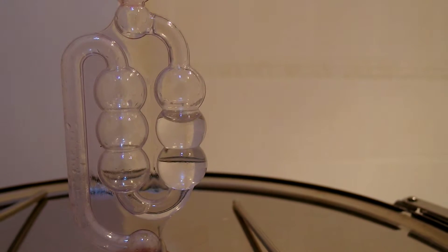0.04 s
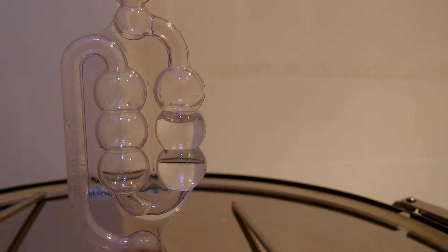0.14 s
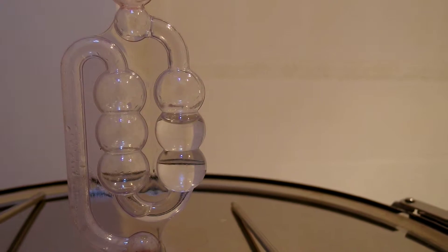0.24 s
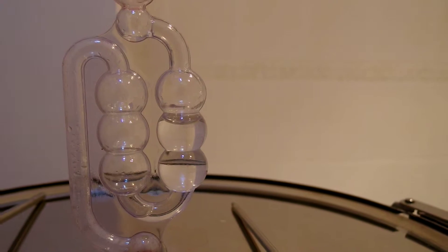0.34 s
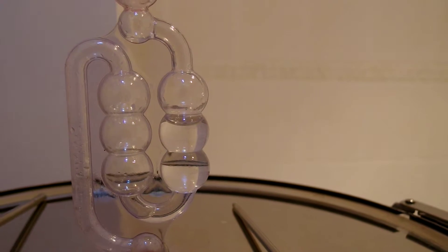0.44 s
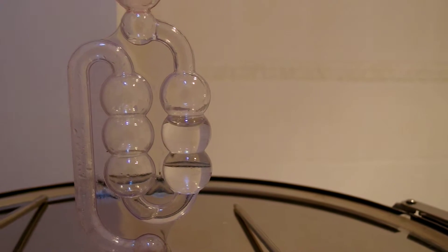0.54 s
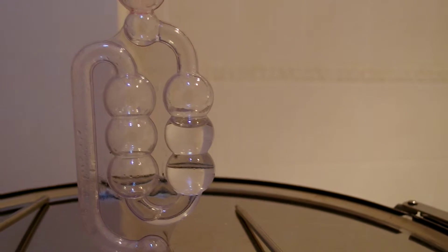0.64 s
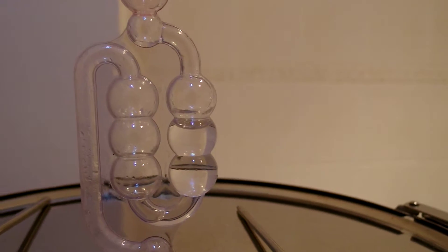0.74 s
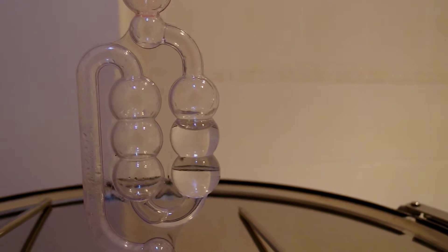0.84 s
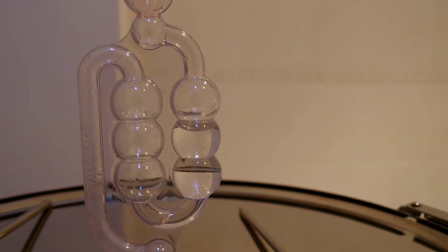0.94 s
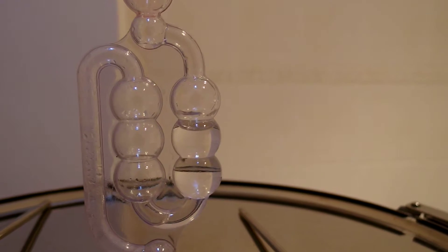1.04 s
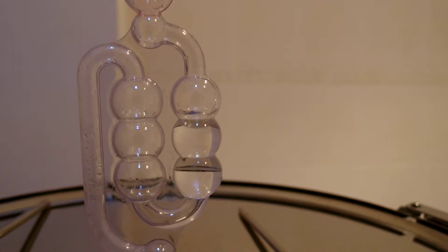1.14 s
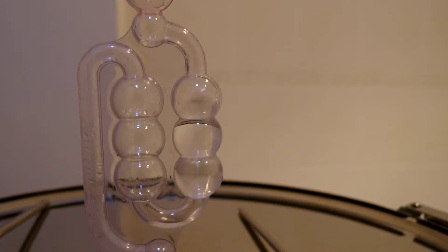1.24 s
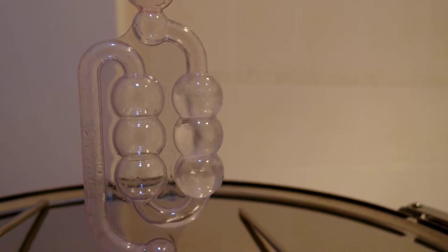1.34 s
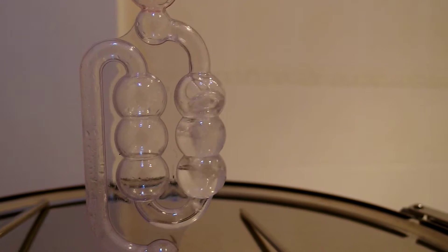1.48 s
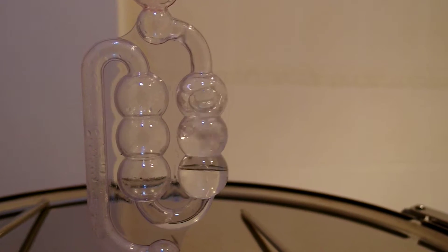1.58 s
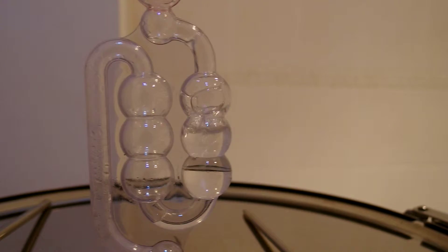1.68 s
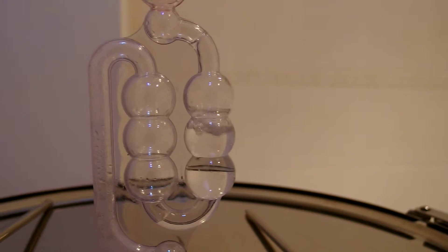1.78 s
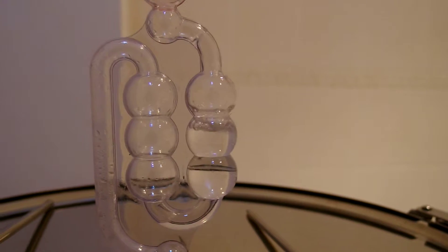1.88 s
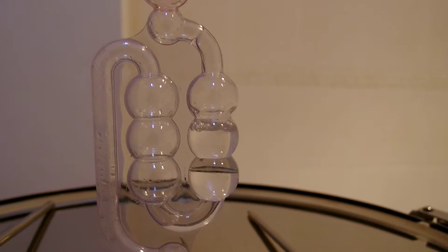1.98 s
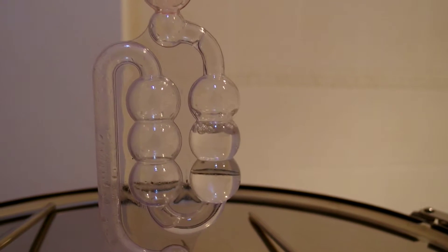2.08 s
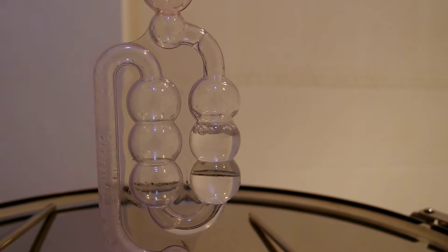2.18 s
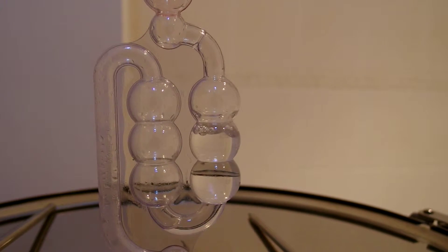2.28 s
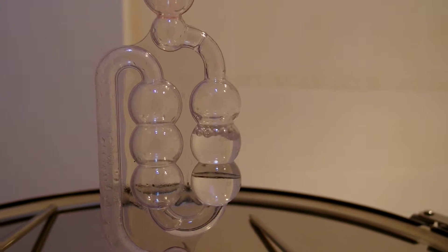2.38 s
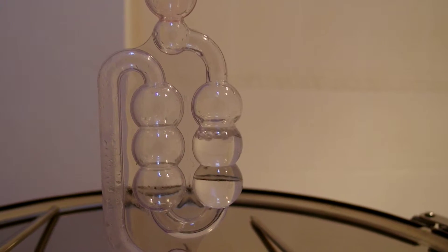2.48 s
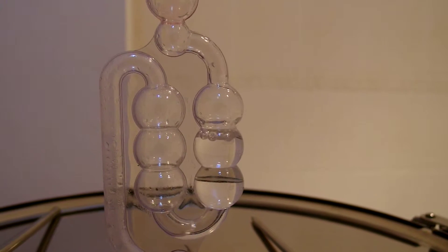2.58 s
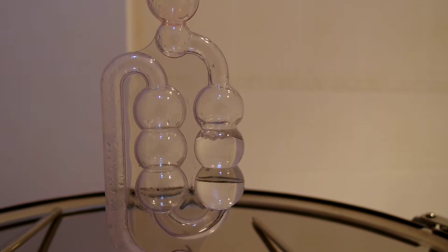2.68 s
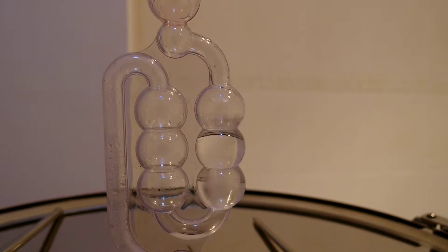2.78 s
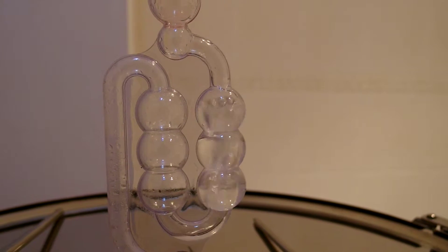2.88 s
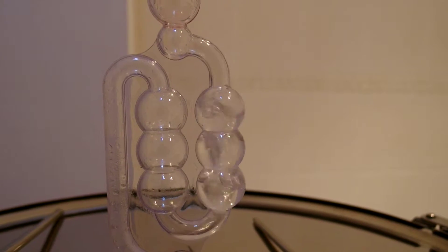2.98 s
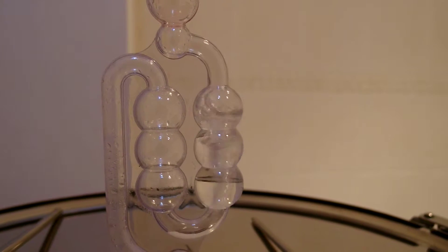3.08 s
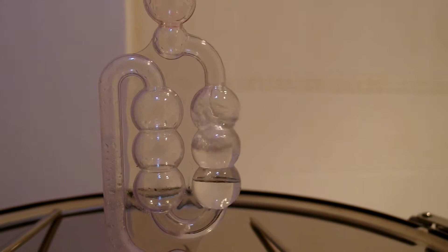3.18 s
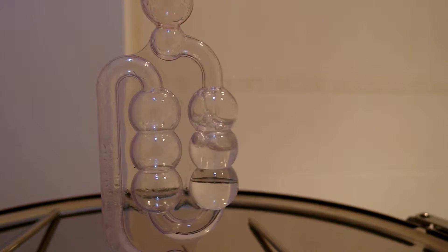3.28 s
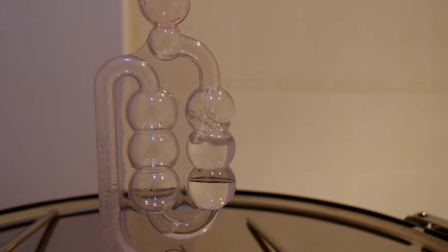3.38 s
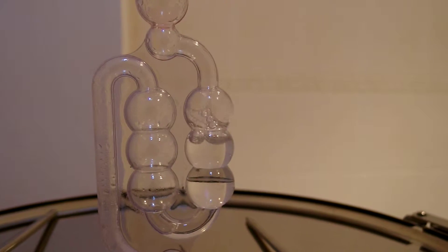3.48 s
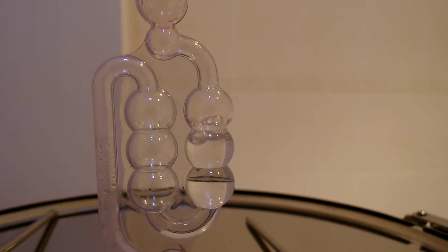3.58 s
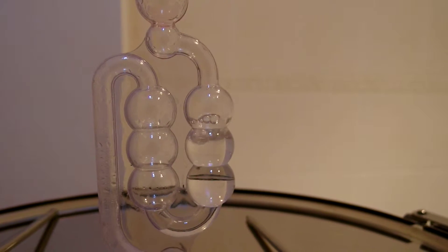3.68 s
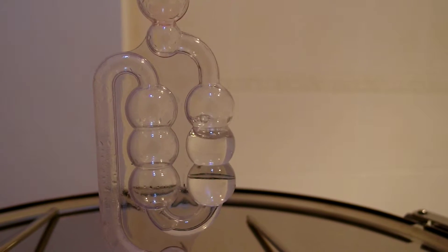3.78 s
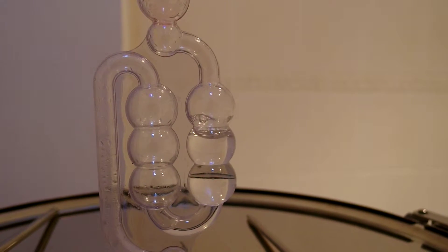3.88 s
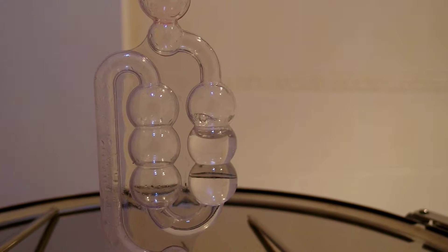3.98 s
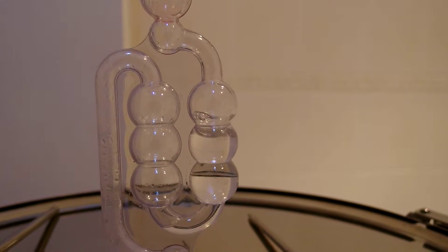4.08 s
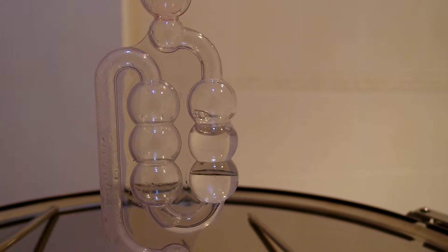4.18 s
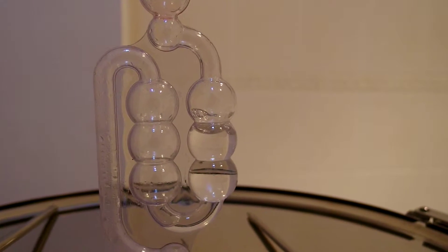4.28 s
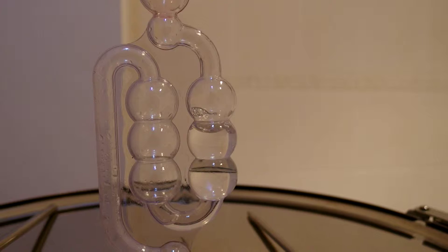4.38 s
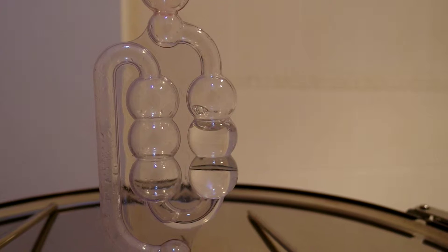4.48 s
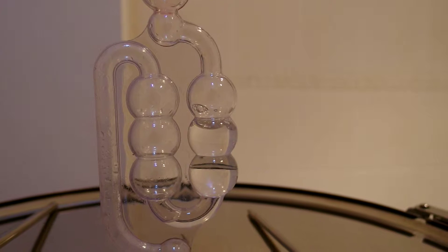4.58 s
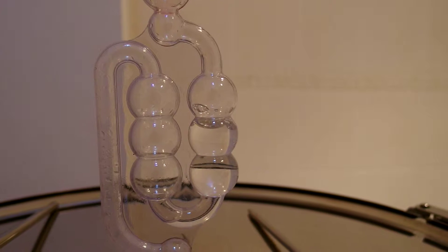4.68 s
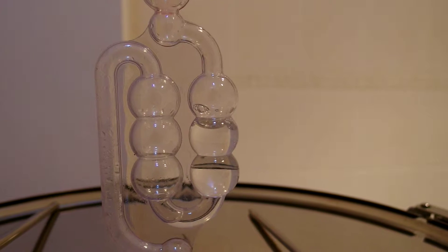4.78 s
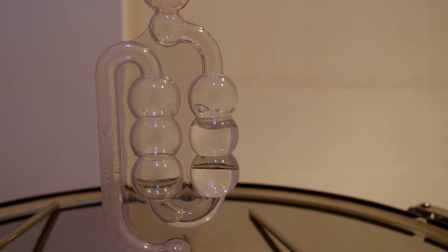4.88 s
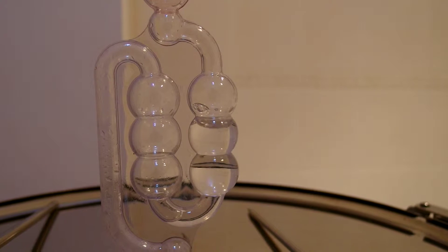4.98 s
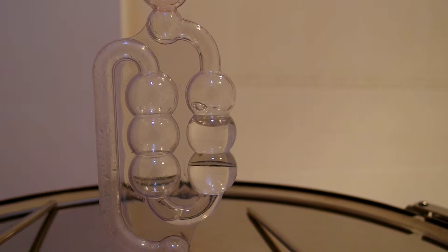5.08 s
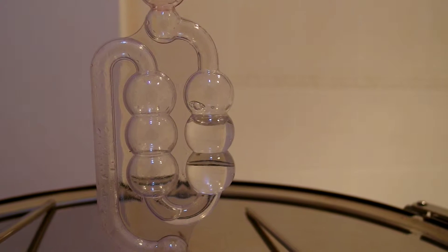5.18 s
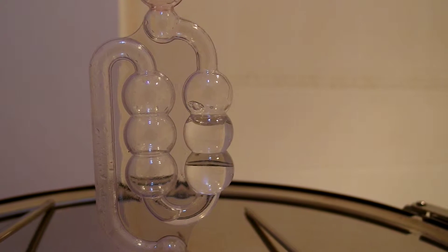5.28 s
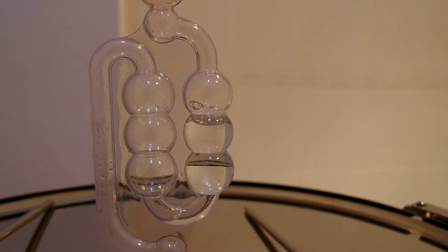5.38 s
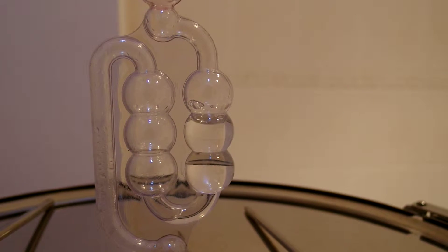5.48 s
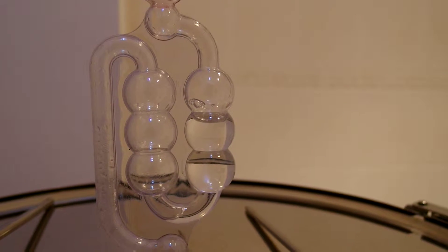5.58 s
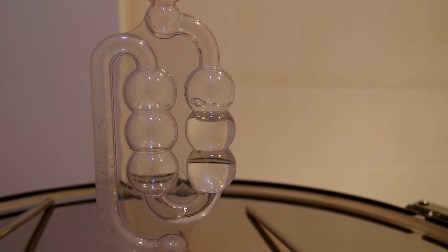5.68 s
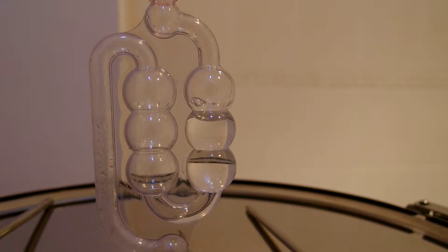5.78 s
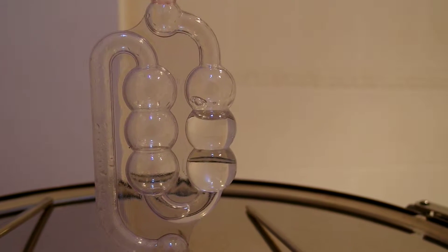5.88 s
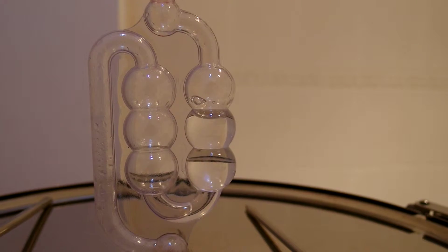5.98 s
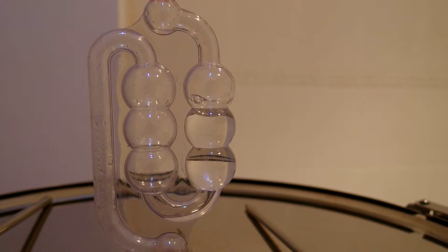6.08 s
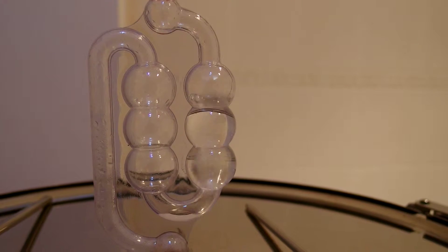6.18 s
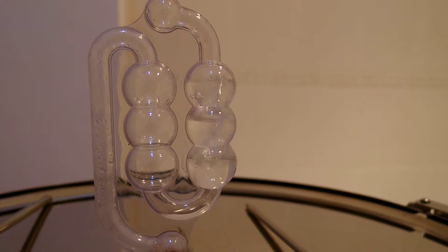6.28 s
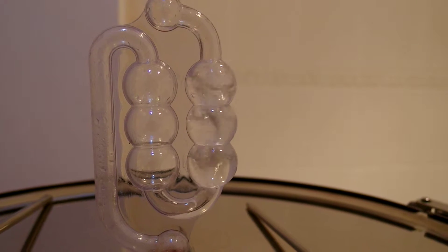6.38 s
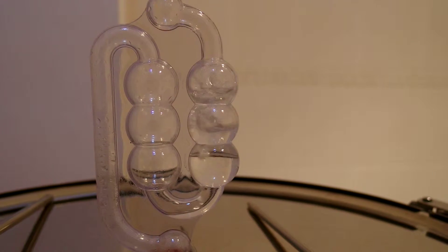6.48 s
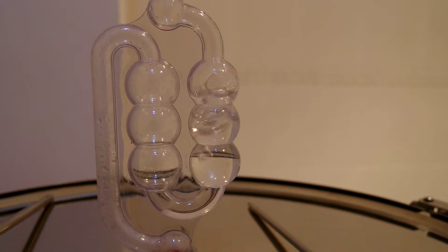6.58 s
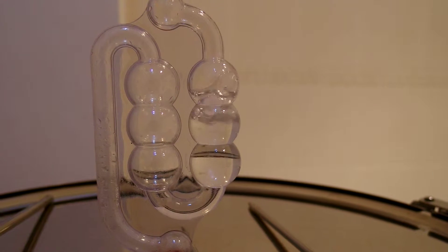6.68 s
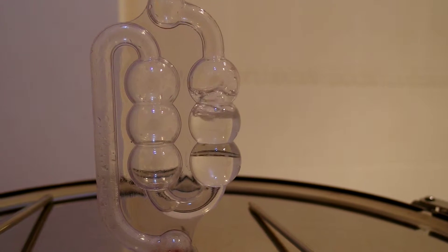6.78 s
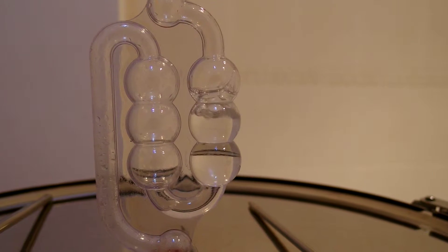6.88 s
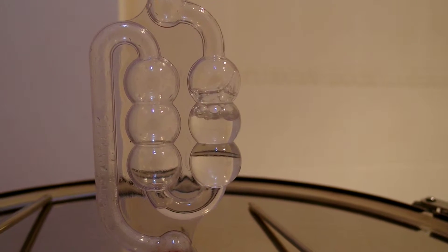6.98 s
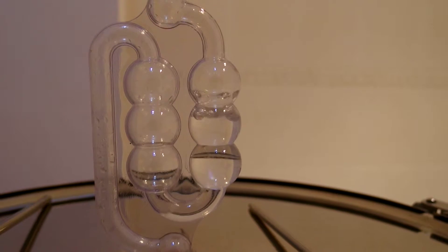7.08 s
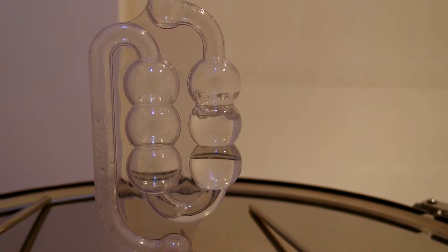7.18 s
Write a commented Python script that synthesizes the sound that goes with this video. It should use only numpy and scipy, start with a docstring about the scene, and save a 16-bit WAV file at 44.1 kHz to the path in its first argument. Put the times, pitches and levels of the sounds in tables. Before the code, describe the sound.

Soft steady hiss, then gas pushes through water in three brief bursts, each about a third of a second: rounded low glugs, fine churning, bright pops and tiny droplets. The drum underneath rings briefly and the small indoor space adds a short echo. The second burst has the sharpest snap; a long quiet gap precedes the last. Heard close, slightly left.

```python
"""Gurgling airlock

Gas leaves a fermenting drum through a water-filled plastic airlock in three gurgles, close to the microphone.
Large gas pockets glug and the drum thuds on a low note: short decaying tones. Churn and spray are crowds of
tiny ones. Bursting bubbles chirp and snap; ringing filters make the drum and fading noise makes the room's
echo. Steady noise hisses throughout over a faint deep wavering; a few very faint glugs fall outside the
gurgles."""
import sys
import numpy as np
from scipy import signal
from scipy.fft import rfft, irfft, next_fast_len
from scipy.io import wavfile

SR = 44100
rng = np.random.default_rng(int(sys.argv[2]) if len(sys.argv) > 2 else 0)


def unload_wav(signal):
    """Save mono or channel-first audio to the path in sys.argv[1] as 16-bit WAV at rate SR, clipped to [-1, 1]."""
    wavfile.write(
        sys.argv[1],
        SR,
        np.round(np.clip(np.atleast_2d(signal).T, -1, 1) * 32767).astype(np.int16),
    )


N = 319372   # length in samples, about 7.2 s
LOCK_PAN_DB = 2.5   # the airlock sounds this much louder on the left


def from_db(db):
    """Turn decibels into a plain gain."""
    return 10 ** (np.asarray(db) / 20)


def at_hz(points, hz):
    """Read a table between its points, on a log-frequency axis."""
    table_hz, values = np.array(points).T
    return np.interp(np.log(hz), np.log(table_hz), values)


def pan(db):
    """Left and right gains for a level difference; positive is louder on the left."""
    return from_db([[db / 2], [-db / 2]])


def add(out, s, sound):
    """Mix a sound in at a time in seconds."""
    i = round(s * SR)
    out[..., i:i + sound.shape[-1]] += sound[..., :N - i]


def bubble(level_db, hz, decay_ms, rise, swell=3.0, order=1):
    """A ringing bubble swells in quickly and dies away; its pitch climbs by the share `rise` per decay time."""
    decay = max(decay_ms, .1) / 1000
    t = np.arange(int(9 * decay * SR)) / SR
    shape = (1 - np.exp(-swell * t / decay)) ** order * np.exp(-t / decay)
    tone = np.sin(2 * np.pi * hz * (t + rise * t * t / decay / 2))
    return from_db(level_db) * shape / shape.max() * tone


def hiss():
    """Steady microphone hiss: smooth noise whose shared and opposed parts have their own colour."""
    # colour of the part alike in both ears: (f/Hz, relative level/dB)
    shared_colour = [(40, -13.5), (70, -10), (170, -12), (400, -6.5), (1000, -8.5), (2900, -8),
                     (3600, -5.5), (4300, 0.5), (5500, -1), (7700, -4), (12600, -2.5), (14500, -6.5),
                     (15800, -8)]
    # opposed part, compared with the shared one: (f/Hz, level/dB)
    opposed_colour = [(60, -3.5), (240, -4), (950, -1.5), (3300, -4), (4500, -2), (6000, 2), (8500, 5),
                      (11000, 0.5), (15000, -5)]
    level_db, pan_db = -60, 0.61   # level of the shared part before panning

    size = next_fast_len(N)
    hz = np.maximum(np.arange(size // 2 + 1) * SR / size, 1)
    white = rfft(rng.standard_normal((2, size)))
    shared_db = at_hz(shared_colour, hz)
    shared = irfft(white[0] * from_db(shared_db), size)[:N]
    opposed = irfft(white[1] * from_db(shared_db + at_hz(opposed_colour, hz)), size)[:N]
    both_ears = shared + opposed * [[1], [-1]]
    return from_db(level_db) / shared.std() * both_ears * pan(pan_db)


def rumble(low_hz=5, top_hz=30, level_db=-97):
    """A faint wavering in the deepest bass: filtered noise, different in each ear."""
    band = signal.butter(1, [low_hz, top_hz], "band", fs=SR, output="sos")
    deep = signal.sosfilt(band, rng.standard_normal((2, N)))
    deep = signal.sosfilt(signal.butter(2, top_hz, fs=SR, output="sos"), deep)
    return from_db(level_db) * deep / deep.std()


def glugs():
    """Large gas pockets ring in the water, each a brief tone with a slightly climbing pitch."""
    # gas pockets: (t/s, level/dB, f/Hz, decay/ms)
    pockets = [(1.182, -59, 888, 6.6), (1.18, -58, 533, 1.7), (1.391, -30, 353, 2.5),
               (1.398, -33, 916, 3.1), (1.402, -41.5, 446, 16), (1.434, -37, 330, 6),
               (1.441, -28.5, 433, 3.6), (1.452, -38, 602, 6.2), (1.477, -24.5, 510, 2.4),
               (1.488, -32, 657.4, 22), (1.499, -31.5, 960, 7.3), (1.507, -28.5, 650, 4.7),
               (1.511, -30.5, 1560, 3), (1.511, -38.5, 205, 9), (1.542, -24.5, 520, 1.5),
               (1.606, -43, 1580, 4.4), (1.561, -37.5, 1310, 3), (1.576, -33.5, 638, 7.4),
               (1.6, -29, 1350, 3.1), (2.582, -63.5, 864, 10), (2.583, -65, 611, 2.5),
               (2.942, -30, 354, 2.7), (2.949, -36.5, 936, 4.8), (2.963, -35.5, 1320, 6.0),
               (2.964, -29.5, 422, 3), (2.969, -35.5, 964, 6), (2.986, -43, 173, 11),
               (2.986, -29, 505, 2.2), (3.006, -35, 440, 16), (3.01, -34, 716, 5.5), (3.02, -35, 877, 7.5),
               (3.022, -35, 513, 9.4), (3.06, -35, 487, 2.3), (3.116, -39, 1326, 10.2),
               (3.135, -35, 485, 5.9), (3.215, -41, 500, 13), (3.089, -35.5, 240, 2.3),
               (3.236, -29.5, 935, 5.3), (3.243, -24.5, 980, 10.6), (3.281, -40, 970, 4.7),
               (3.611, -69, 884, 23), (3.265, -37, 970, 4.8), (6.327, -41, 223, 9.8),
               (6.332, -37.5, 653, 8.4), (6.356, -41, 663, 8.7), (6.372, -33.5, 413, 9.4),
               (6.375, -34.5, 951, 9.1), (6.373, -41, 1460, 6.6), (6.391, -37, 506, 6.4),
               (6.414, -40, 407, 22), (6.423, -28.5, 560, 2.4), (6.426, -35, 283, 7.6),
               (6.443, -36, 970, 4.9), (6.465, -32, 620, 3.9), (6.465, -32.5, 322, 6.7),
               (6.495, -38.5, 447, 16), (6.497, -33.5, 585, 3), (6.509, -36.5, 1520, 1.9),
               (6.51, -31, 944, 10.4), (6.524, -30, 680, 1.2), (6.548, -58, 920, 3.7)]
    out = np.zeros(N)
    for s, level_db, hz, decay_ms in pockets:
        add(out, s, bubble(level_db, hz, decay_ms, rise=.012, swell=5.9, order=2))
    return out


def drum(x):
    """The water's sounds drive the drum's modes, tuned resonances that ring on after it."""
    # the drum's resonances: (f/Hz, gain at the peak/dB, time to fall by 60 dB/s)
    modes = [(236.7, 2.5, 0.68), (246, 3, 0.18), (440, 0, 0.2), (552, -8.5, 0.36), (657, 0, 0.3),
             (835, -3, 0.098), (942, -6, 0.2), (949, 1.5, 0.087), (972, -2, 0.26), (1320, -4, 0.35),
             (1386, -4, 0.14), (1640, -25, 0.3)]
    out = np.zeros(N)
    for hz, gain_db, t60 in modes:
        r = from_db(-60 / (t60 * SR))   # what is left of the ringing after each sample
        w = 2 * np.pi * hz / SR
        drive = [0, 2 * (1 - r) * np.sin(w)]
        ringing = [1, -2 * r * np.cos(w), r * r]
        # the tiny constant keeps the filter clear of extremely small numbers
        out += from_db(gain_db) * signal.lfilter(drive, ringing, x + 1e-18)
    return out


def room(x):
    """One near wall echoes; a diffuse tail dies band by band, less alike in the two ears towards the treble."""
    # how long each pitch range lingers: (f/Hz, time to fall by 60 dB/s)
    fall_times = [(150, 0.5), (500, 0.32), (1500, 0.29), (4000, 0.34), (8000, 0.23), (15000, 0.056)]
    # strength of the tail: (f/Hz, level/dB)
    tail_levels = [(150, -16.5), (500, -9), (1500, -6.5), (4000, -12.5), (8000, -5.5), (15000, -16)]
    # left-right likeness of the tail: (f/Hz, likeness/0 to 1)
    likeness = [(150, 0.94), (1500, 0.86), (4000, 0.76), (8000, 0.36)]
    wall_s, wall_db, tail_start_s = .0085, -18, .002

    t = np.arange(SR // 2) / SR
    edges = 100 * 2 ** np.arange(0, 7.5, .5)   # half-octave bands, in Hz
    white = rng.standard_normal((2, 2, len(t)))
    tail = 0
    for k, (low, high) in enumerate(zip(edges, edges[1:])):
        band_filter = signal.butter(2, [low, high], "band", fs=SR, output="sos")
        shared, opposed = signal.sosfilt(band_filter, white[k % 2])   # neighbouring bands use different noise
        hz = np.sqrt(low * high)
        fade = from_db(-60 * t / at_hz(fall_times, hz)) * (t > tail_start_s)
        alike = np.clip(at_hz(likeness, hz), 0, 1)
        band = np.sqrt(1 + alike) * shared + np.sqrt(1 - alike) * opposed * [[1], [-1]]
        tail = tail + from_db(at_hz(tail_levels, hz)) * band * fade / np.sqrt(np.sum(fade ** 2))
    tail[:, round(wall_s * SR)] += from_db(wall_db)
    return signal.fftconvolve(x, tail, axes=1)[:, :N]


def churn(low_hz=230, first_top_hz=800, last_top_hz=2000, cycles=1.95, spread_db=1.5, tilt_db=-0.5):
    """Countless small bubbles ring as gas passes: the smaller, the higher and weaker; the froth gets finer."""
    # strength of the churn, one list for each gurgle: (t/s, level/dB before the offset below)
    gurgle_levels = [
        [(1.362, -72), (1.37, -36), (1.392, -34), (1.466, -31.5), (1.478, -33), (1.566, -45), (1.578, -37.5),
         (1.66, -47)],
        [(2.915, -48), (2.939, -32), (3.029, -32), (3.073, -37.5), (3.137, -38), (3.167, -58), (3.209, -44),
         (3.247, -42), (3.3, -69)],
        [(6.312, -54), (6.33, -31.5), (6.366, -42.5), (6.372, -33), (6.474, -41), (6.486, -33), (6.514, -33.5),
         (6.6, -54)],
    ]
    per_s, offset_db = 500, -12.5
    out = np.zeros(N)
    for rows in gurgle_levels:
        s, level_db = np.transpose(rows)
        length = s[-1] - s[0]
        for when, size, luck in rng.random((round(per_s * length), 3)):
            at = s[0] + when * length
            # the highest pitch climbs through the first half, then stays
            top_hz = first_top_hz * (last_top_hz / first_top_hz) ** min(2 * when, 1)
            hz = low_hz * (top_hz / low_hz) ** size
            db = np.interp(at, s, level_db) + offset_db
            db += tilt_db * np.log2(hz / low_hz)   # weaker with each octave up
            db -= spread_db * np.log(luck + .02)   # a few stand out louder
            add(out, at, bubble(db, hz, 1000 * cycles / hz, rise=0.087))
    return out


def thuds():
    """The drum thuds again and again during the gurgles; every thud rings the same low note."""
    # thuds: (t/s, level/dB)
    hits = [(1.371, -48), (1.454, -41), (1.51, -43), (1.565, -44.5), (1.64, -52.5), (2.922, -43.5),
            (2.987, -37), (3.018, -55), (3.072, -42.5), (3.159, -52), (3.24, -51.5), (6.327, -42.5),
            (6.371, -48), (6.428, -41.5), (6.496, -43), (6.581, -53.5)]
    hz, decay_ms = 246.1, 29.6
    out = np.zeros(N)
    for s, level_db in hits:
        add(out, s, bubble(level_db, hz, decay_ms, rise=0, swell=10.0, order=2))
    return out


def pops(cycles=2.97, pan_spread_db=4, snap_db=-14):
    """Small bubbles burst at the surface: a short chirp on top of the broad snap of the tearing film."""
    # bursts: (t/s, level/dB, f/Hz)
    bursts = [(1.3853, -44, 6260), (1.4275, -35.5, 10600), (1.4267, -40, 14200), (1.443, -35, 11500),
              (1.4535, -33, 2340), (1.4531, -35, 4150), (1.4704, -32, 9200), (1.5031, -29, 3920),
              (1.5058, -25, 10600), (1.506, -23, 8640), (1.5072, -31, 2580), (1.5084, -34, 4170),
              (1.5983, -27.5, 3730), (1.6156, -37.5, 7100), (1.6162, -34, 4860), (2.9376, -41.5, 8400),
              (2.964, -35, 6660), (2.9637, -30.5, 11400), (3.0238, -27.5, 2670), (3.0233, -30, 3870),
              (3.033, -28.5, 3800), (3.046, -33, 4100), (3.0462, -29, 6340), (3.0792, -38, 6640),
              (3.0796, -21, 13000), (3.0799, -39, 3860), (3.132, -30, 11600), (3.134, -36, 2860),
              (3.1335, -15, 4650), (3.271, -39, 9800), (3.2721, -36.5, 3250), (3.2724, -21.5, 4810),
              (6.334, -39.5, 10900), (6.338, -39, 4500), (6.3725, -30.5, 5200), (6.373, -38, 8950),
              (6.383, -33, 4200), (6.415, -38, 7800), (6.4388, -27.5, 2420), (6.4404, -25.5, 5660),
              (6.4403, -33.5, 11800), (6.4435, -33.5, 6850), (6.4484, -39, 1960), (6.4946, -25.5, 2930),
              (6.4954, -24.5, 4160), (6.501, -26.5, 4030), (6.571, -36, 10900), (6.573, -41, 4100)]
    # close to the microphones the balance depends on pitch: (f/Hz, left-right difference/dB)
    balance = [(2500, 1), (4500, 4.5), (6600, 12.5), (8800, -6), (11000, -0.5)]
    out = np.zeros((2, N))
    for s, level_db, hz in bursts:
        place = pan(at_hz(balance, hz) + pan_spread_db * rng.standard_normal())
        chirp = bubble(level_db, hz, 1000 * cycles / hz, rise=.04, swell=3.5, order=2)
        add(out, s, place * chirp)
        # differences between noise samples favour the treble
        snap = np.diff(rng.standard_normal(64)) * np.exp(-np.arange(63) / 9.0)
        add(out, s, place * from_db(level_db + snap_db) * snap / 2)
    return out


def bulbs(x, scatter_db=-2, decay_ms=2.65):
    """The hard walls of the bulbs and tube scatter each burst, smearing it over a few milliseconds."""
    fade = np.exp(-np.arange(SR // 50) / SR / (decay_ms / 1000))
    scatter = from_db(scatter_db) * rng.standard_normal(len(fade)) * fade / np.sqrt(np.sum(fade ** 2))
    scatter[0] = 1   # the direct sound
    smeared = signal.fftconvolve(x, scatter[None], axes=1)[:, :N]
    return smeared / np.sqrt(np.sum(scatter ** 2))


def spray(low_hz=1600, top_hz=4500, cycles=2.12, spread_db=1.0):
    """Fine droplets thrown up in the upper bulb land densely, each a tiny short ring."""
    # strength of the spray, one list for each gurgle: (t/s, level/dB before the offset below)
    gurgle_levels = [
        [(1.39, -54), (1.444, -45), (1.452, -37.5), (1.59, -50), (1.598, -31), (1.606, -54), (1.66, -69)],
        [(2.96, -50), (3.014, -42), (3.022, -38.5), (3.106, -45), (3.13, -61), (3.2, -80)],
        [(6.35, -47), (6.428, -57), (6.438, -28), (6.482, -56), (6.498, -23), (6.514, -56), (6.6, -54)],
    ]
    per_s, offset_db = 1000, -11.5
    out = np.zeros(N)
    for rows in gurgle_levels:
        s, level_db = np.transpose(rows)
        length = s[-1] - s[0]
        for when, size, luck in rng.random((round(per_s * length), 3)):
            at = s[0] + when * length
            hz = low_hz * (top_hz / low_hz) ** size
            db = np.interp(at, s, level_db) + offset_db
            db -= spread_db * np.log(luck + .02)   # a few stand out louder
            add(out, at, bubble(db, hz, 1000 * cycles / hz, rise=0.15))
    return out


def lid_booms():
    """The drum lid booms with each gurgle; its two low modes lie close enough to beat."""
    # booms: (t/s, level of the lower mode/dB, level of the upper mode/dB)
    booms = [(1.401, -68, -56), (2.949, -58.5, -62.5), (6.362, -65, -62)]
    # the lid's two modes, lower first: (f/Hz, decay/ms)
    lid_modes = [(103.5, 143), (119, 163)]
    out = np.zeros(N)
    for s, *levels in booms:
        for level_db, (hz, decay_ms) in zip(levels, lid_modes):
            add(out, s, bubble(level_db, hz, decay_ms, rise=0, swell=5.0))
    return out


def scene(bass_cut_hz=106):
    """Water, drum, bursts and spray sound in the room, over the hiss and rumble."""
    water = glugs() + churn() + thuds() + lid_booms()
    airlock = (water + drum(water) + spray()) * pan(LOCK_PAN_DB)
    near = airlock + bulbs(pops())
    sound = near + room(near)
    # the small microphone drops the deep bass of near sounds
    sound = signal.sosfilt(signal.butter(2, bass_cut_hz, "high", fs=SR, output="sos"), sound)
    return sound + hiss() + rumble()


def record(dry, cutoff_hz=16000, offset=-0.00017):
    """A steep filter cuts the top; the converter sits slightly off zero."""
    top_cut = signal.cheby2(20, 60, cutoff_hz, fs=SR, output="sos")
    return signal.sosfilt(top_cut, dry) + offset


dry = scene()
out = record(dry)
unload_wav(out)
```